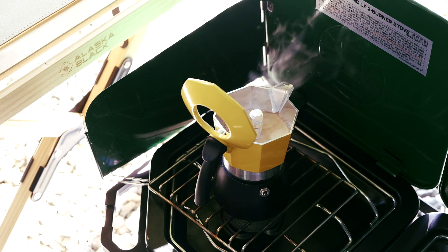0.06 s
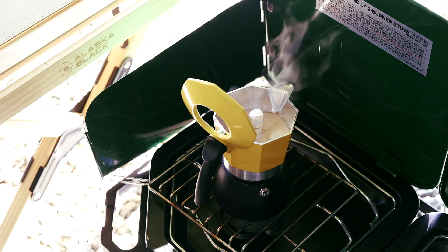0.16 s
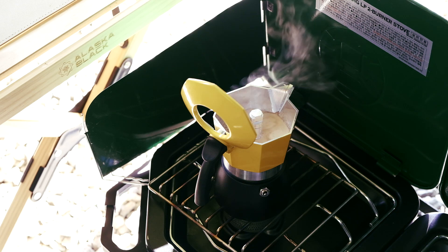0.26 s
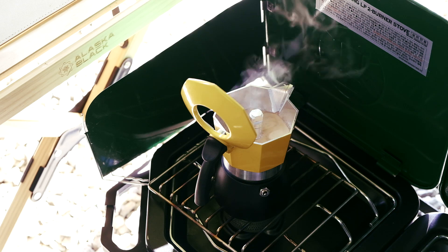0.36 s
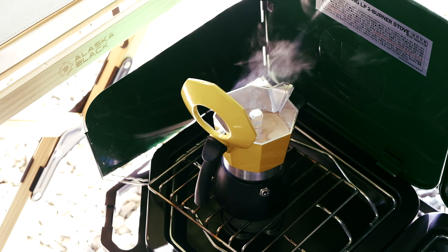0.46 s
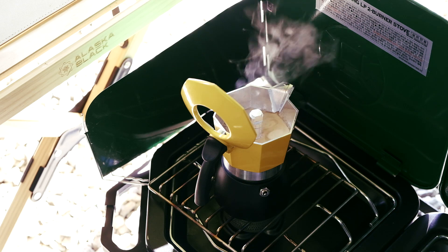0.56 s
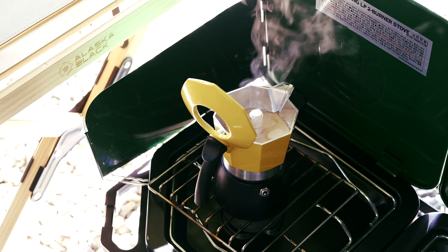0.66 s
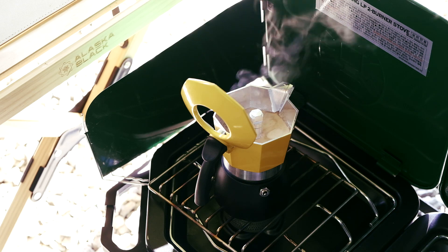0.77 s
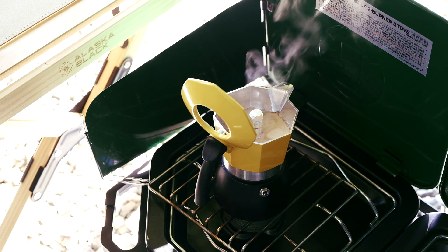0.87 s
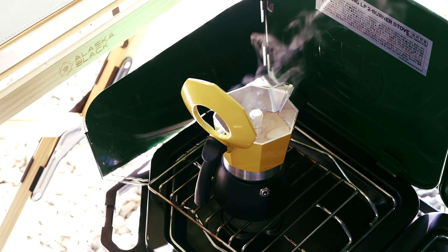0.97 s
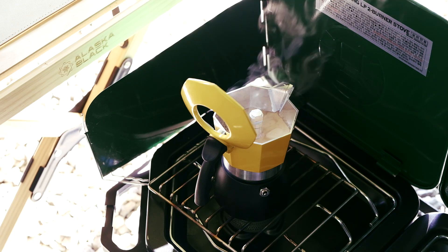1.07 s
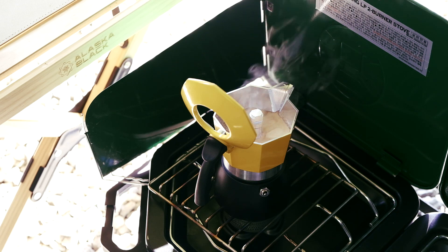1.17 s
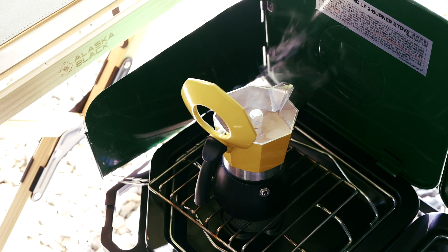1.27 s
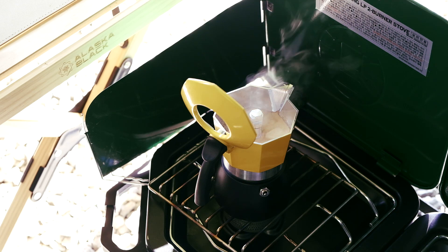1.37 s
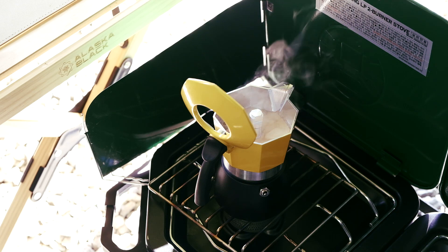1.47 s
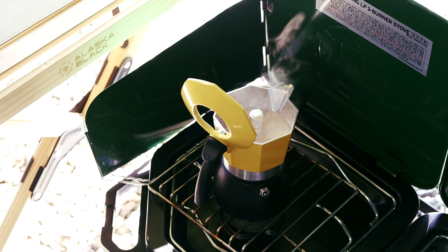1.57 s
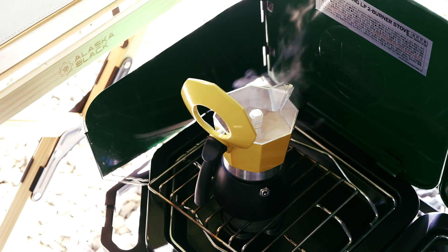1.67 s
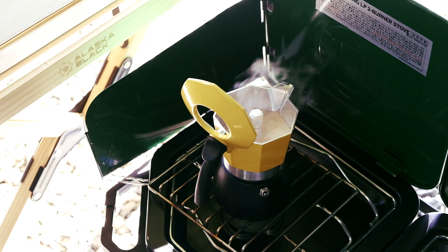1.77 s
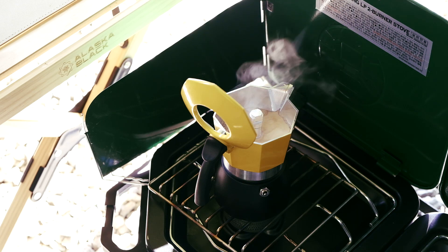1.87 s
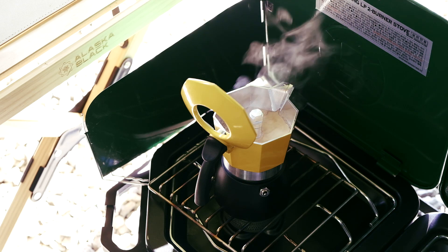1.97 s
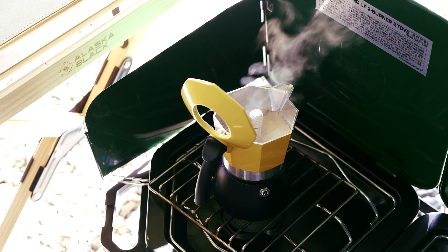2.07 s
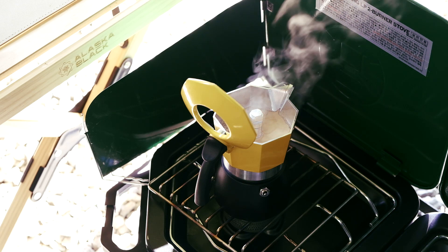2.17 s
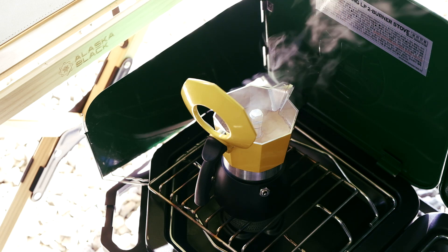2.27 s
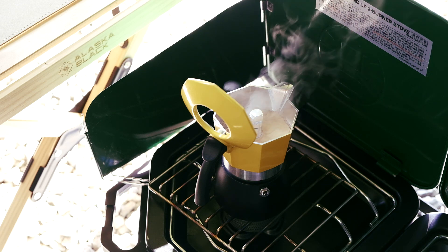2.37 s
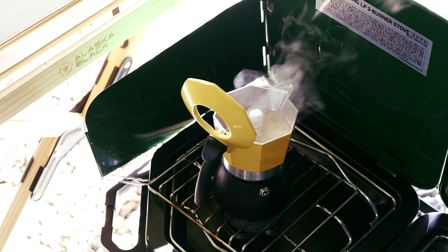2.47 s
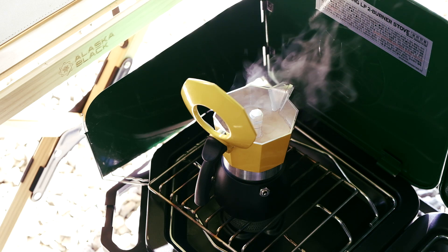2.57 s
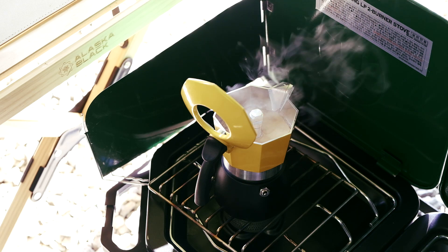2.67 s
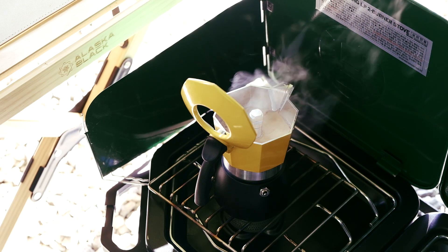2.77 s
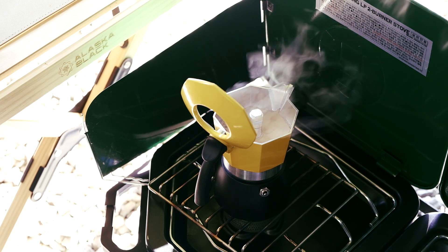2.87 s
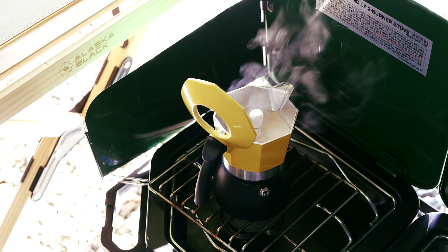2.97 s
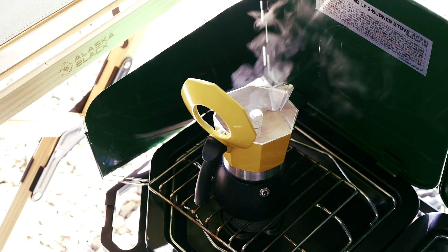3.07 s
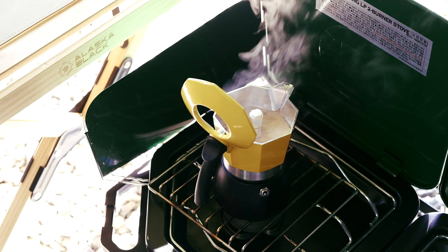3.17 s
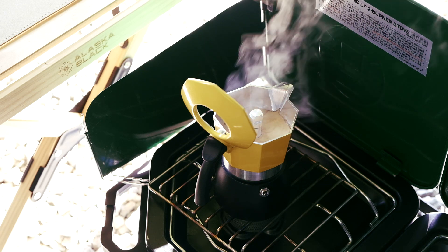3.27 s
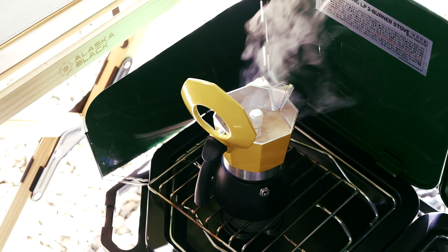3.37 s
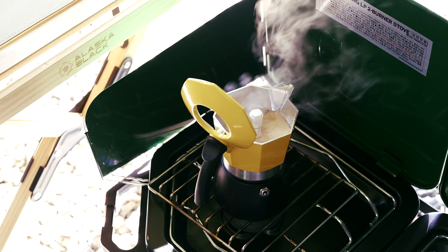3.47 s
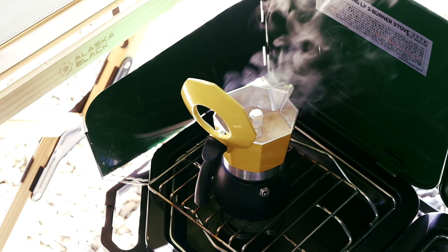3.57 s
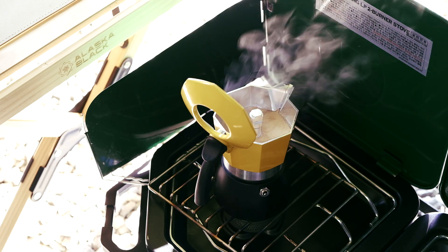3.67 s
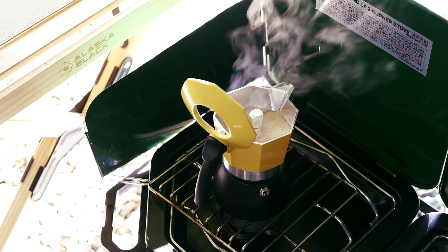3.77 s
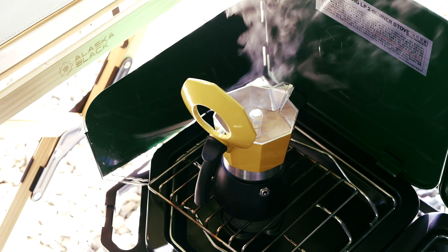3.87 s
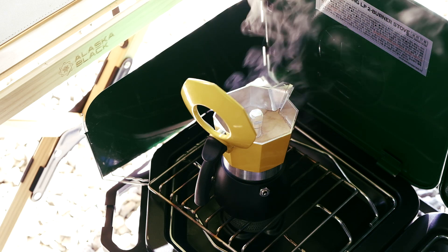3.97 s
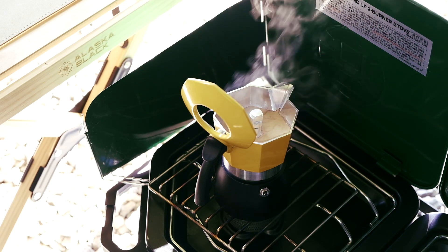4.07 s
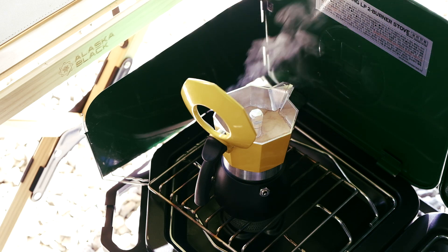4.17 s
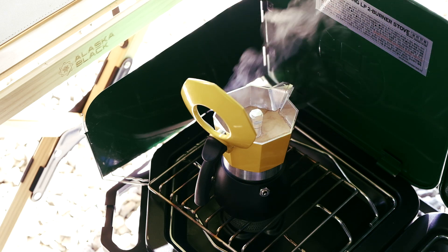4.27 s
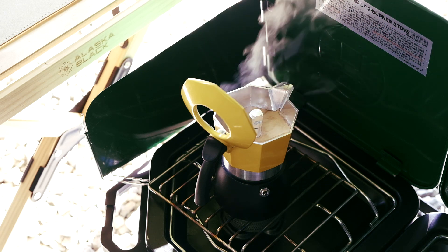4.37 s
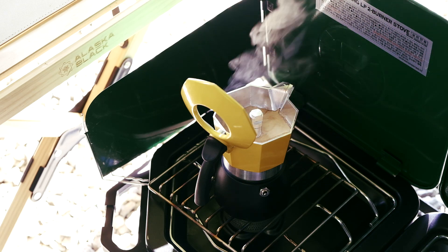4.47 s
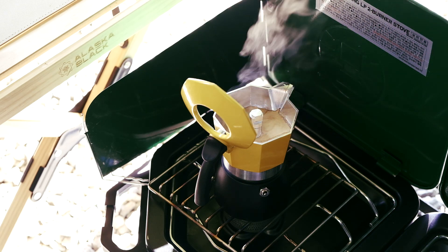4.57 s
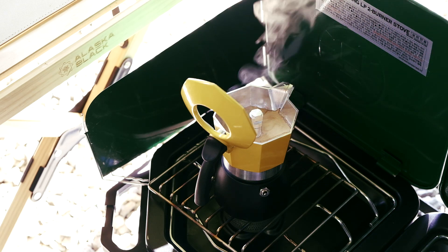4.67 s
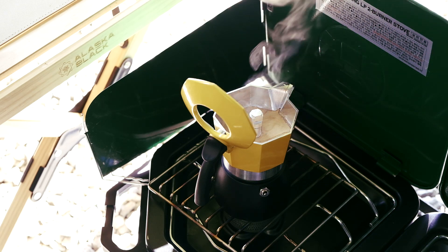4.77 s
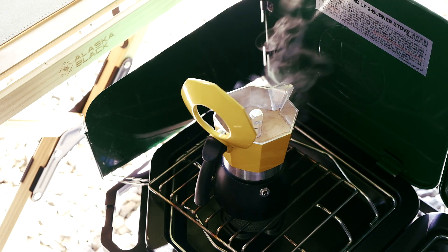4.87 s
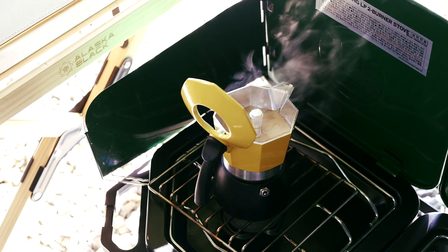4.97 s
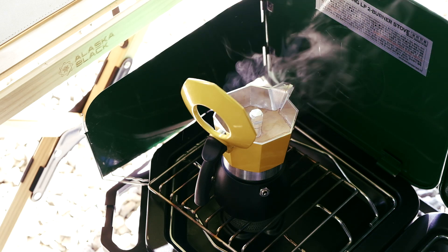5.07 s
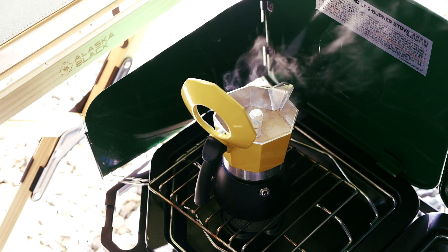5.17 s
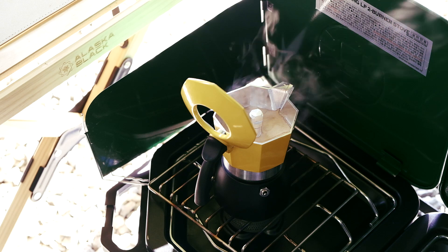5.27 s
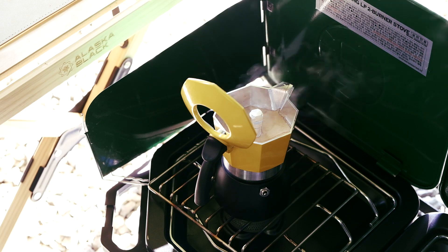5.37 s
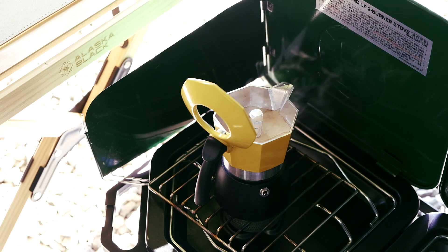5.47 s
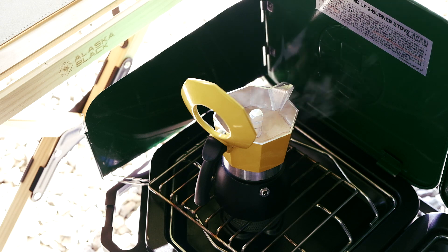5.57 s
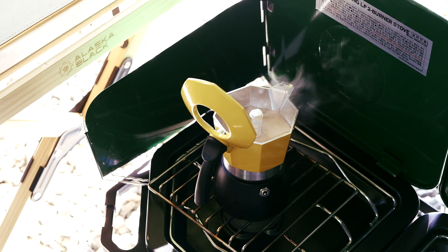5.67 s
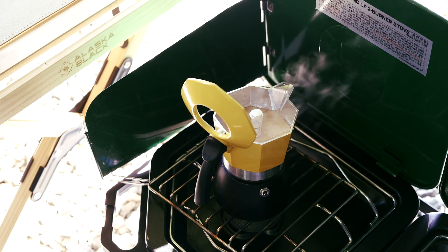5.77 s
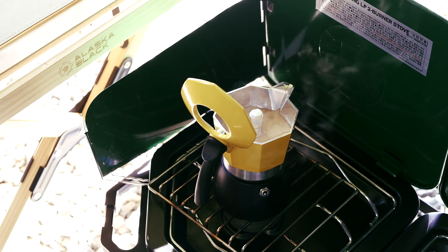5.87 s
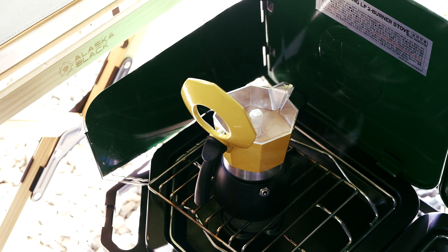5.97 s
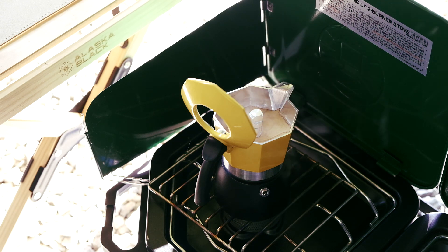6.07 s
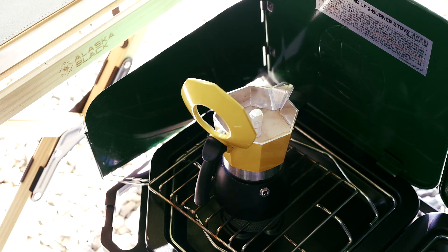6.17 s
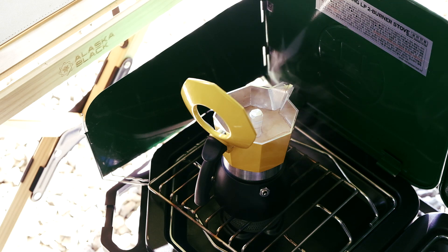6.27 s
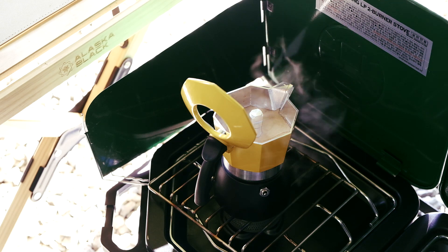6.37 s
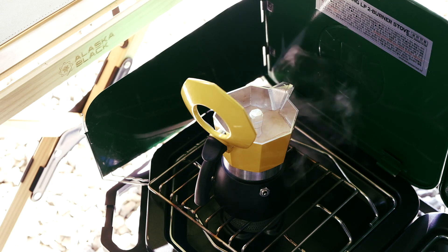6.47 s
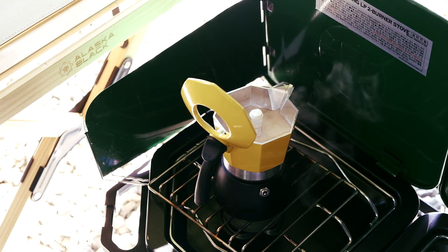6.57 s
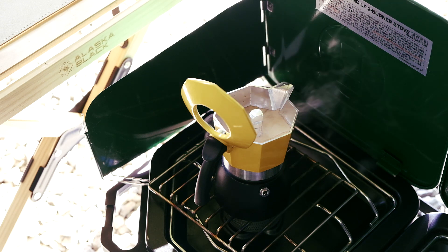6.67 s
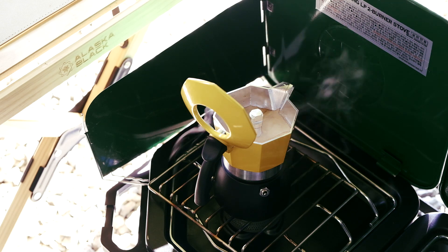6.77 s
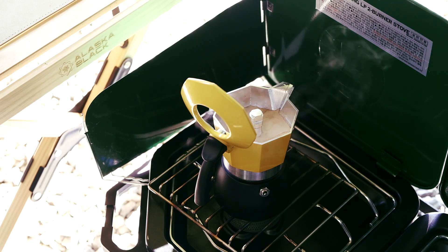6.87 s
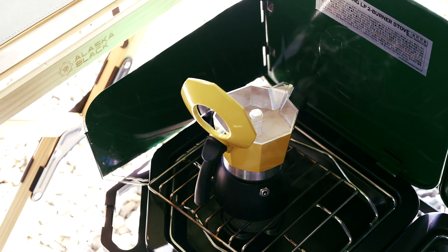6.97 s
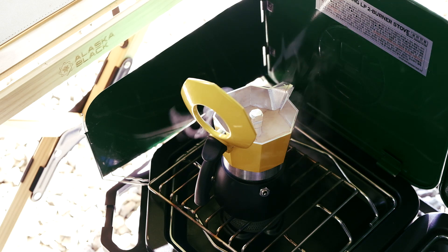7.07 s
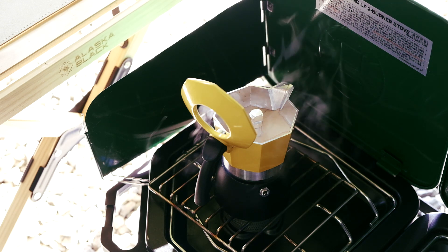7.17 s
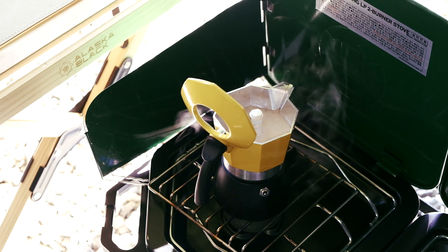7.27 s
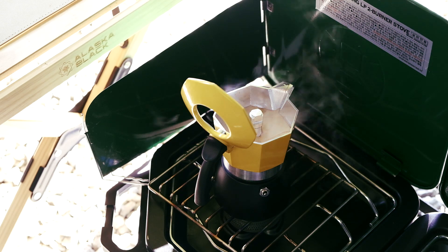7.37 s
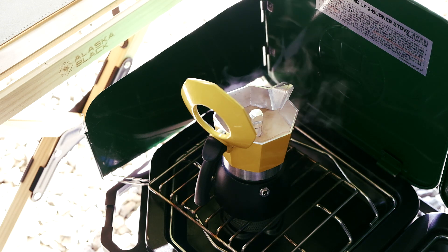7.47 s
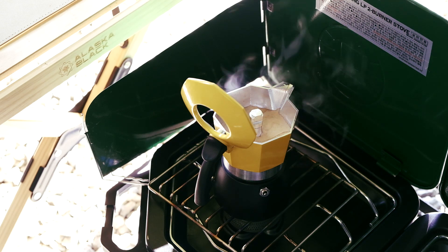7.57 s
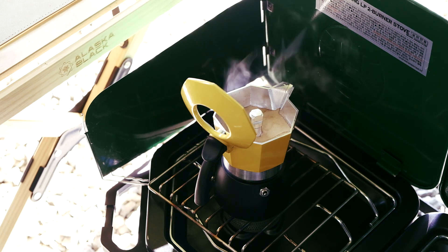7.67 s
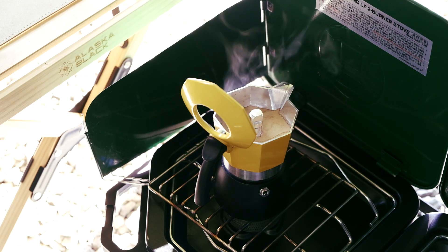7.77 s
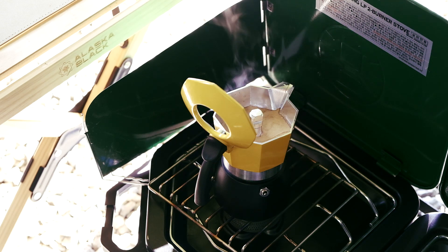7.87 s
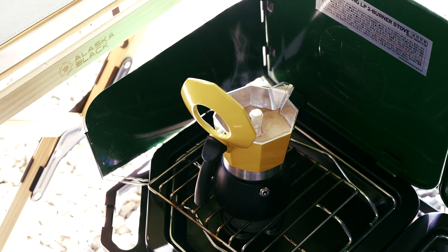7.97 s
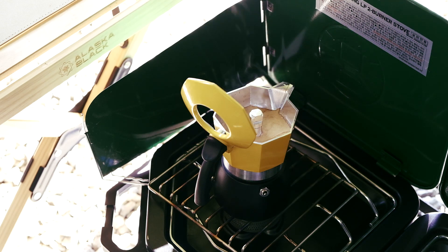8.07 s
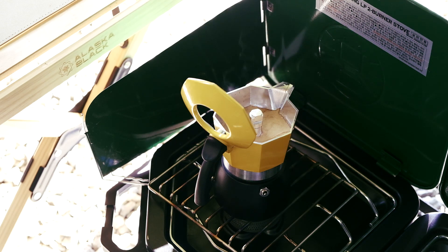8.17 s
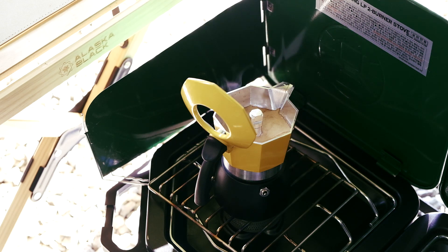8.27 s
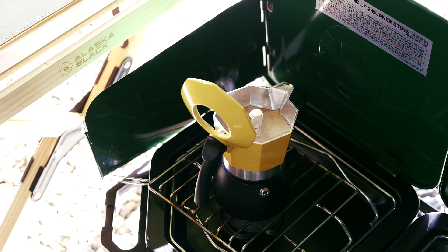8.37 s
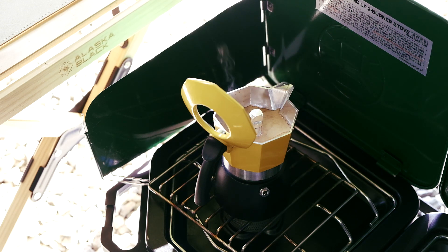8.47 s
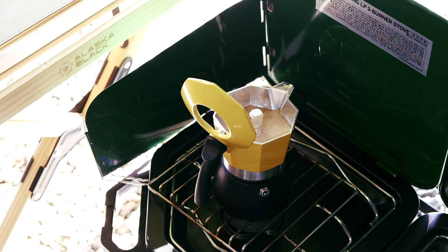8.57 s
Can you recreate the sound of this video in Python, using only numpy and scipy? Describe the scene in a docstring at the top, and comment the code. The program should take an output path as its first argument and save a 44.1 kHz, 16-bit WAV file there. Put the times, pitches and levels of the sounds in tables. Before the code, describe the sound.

A stovetop coffee pot sputters, puffs and squeaks over a fading burner roar; the valve turns shut, leaving faint outdoor air, distant engine and small knocks.

```python
"""A stovetop coffee pot on a gas camping stove, heard close by; a far engine and campsite air run throughout.
From the start noise rings the metal case (roar) and the nozzle (hiss); the roar shrinks as the gas is eased back.
From 2.2 s the hiss sputters ever more, then steam spurts and pitch-climbing wet puffs join; thin squeaks from 4.2 s.
At 5.4 s the knob gives a soft knock: damped modes under a noise scrape. From 7.16 s turns step the valve down to shut.
Further soft knocks follow from 7.76 s; at 8.2 s the valve leaks again and its slit whistles."""
import sys
import numpy as np
from scipy import signal
from scipy.fft import rfft, irfft, next_fast_len
from scipy.io import wavfile
from scipy.ndimage import uniform_filter1d

SR = 44100
rng = np.random.default_rng(int(sys.argv[2]) if len(sys.argv) > 2 else 0)


def master_out(mix):
    """Clip the mix to full scale and print it as 16-bit PCM to the path in sys.argv[1]."""
    frames = np.transpose(np.atleast_2d(mix))
    ceiling = np.clip(frames, -1, 1)
    pcm = np.round(ceiling * 32767).astype(np.int16)
    wavfile.write(sys.argv[1], SR, pcm)


N = 379701
TAPS = 4096
HZ = np.maximum(np.fft.rfftfreq(TAPS, 1 / SR), 1)
TIME = np.arange(N) / SR

# roar shrinking as the gas is eased back: t/s, level/dB
FLAME_ROAR = [(0, -23), (.6, -24), (1.5, -25), (2.7, -26), (3.5, -28), (4.4, -29.5), (5.4, -31),
              (6.3, -33.5), (7.16, -35.5)]
# resonances of the case: f/Hz, width/Hz, level/dB, left minus right/dB
CASE_MODES = [(404, 133, -9.5, 2), (531, 49, -13, -3), (940, 350, -11, -0.5), (1043, 108, -9.5, -1),
              (1370, 80, -4, 0), (1542, 184, -1.5, -0.5), (1790, 90, -5.5, 6), (1951, 105, -3, -5.5),
              (2113, 147, -1.5, -2.5), (2322, 280, -7, -4), (2468, 45, -3.5, -1), (2630, 280, -8, -5),
              (2820, 130, -11, -10), (2944, 190, -11, 2), (3133, 104, -6.5, 1.5), (3310, 133, -7, -3.5),
              (3577, 300, -10.5, -2), (3730, 160, -9.5, -0.5), (3910, 45, -11, 4), (4046, 89, -14, 0),
              (4196, 160, -17.5, -2), (4370, 97, -21, 0)]
# resonances of the burner head: f/Hz, width/Hz, level/dB, left minus right/dB
BURNER_MODES = [(266, 230, -25.5, -1), (1635, 94, -3.5, 2)]
# bands of the case: from f/Hz, to f/Hz, level against full roar/dB, share of shrinking followed,
# share of top-hiss swell followed, waver/dB, flicker/dB, grain/dB, drop while a spurt is wide open/dB
CASE_BANDS = [(0, 700, -19.5, 1.02, .01, 1.5, 0.5, -0.5, -1),
              (700, 2200, 0.21, 1.046, .01, 0.18, 0.75, 0.77, 2),
              (2200, 3400, -5.5, 0.51, 0.24, -0.62, 0.9, 1.45, 6.5),
              (3400, 5000, -16.5, 0.066, 0.16, -0.5, 1.6, 0.9, 5.5)]
# brief flare-ups and gutterings of the starved flame: t/s, change/dB
FLAME_FLARES = [(4.525, 2), (6.87, 3), (7.125, 1.5), (7.235, 4), (7.254, 4), (7.295, 7), (7.325, -7.5),
                (7.341, 8), (7.355, -10), (7.375, 3.5), (7.398, 5.5)]
FLARE_S = 0.0036


def flame(eddy, pops):
    """Roar: deep modes shrink with the flame, steam feeds the highest, except while it spurts."""
    full_db, first_top_db = FLAME_ROAR[0][1], JET_LEVELS[0][2]
    low_db, top_db = curves(JET_LEVELS)[:2]
    shrink_db = curves(FLAME_ROAR)[0] - full_db
    steam_db = top_db - first_top_db
    shut_db = valve()[0]
    flare_db = sum(rise_db * np.exp(-((TIME - s) / FLARE_S) ** 2) for s, rise_db in FLAME_FLARES)
    surge = spurts()[0][0]
    open_share = surge / (surge + undb(low_db))
    roar = 0
    for lo, hi, db, share, fed, waver_db, flicker_db, grain_db, starve_db in CASE_BANDS:
        level_db = full_db + db + share * shrink_db + fed * steam_db
        level_db = level_db + flare_db + shut_db - starve_db * open_share
        flow = undb(level_db) * flutter(eddy, waver_db, flicker_db, grain_db)
        roar = roar + turbulence(flow, band(CASE_MODES + BURNER_MODES, lo, hi), pops)
    return roar


def popping(rate_per_s=400, size_db=12):
    """Tiny pockets of gas ignite at random; every resonance of flame and jets hears the same pop."""
    ignites = rng.random(N) < rate_per_s / SR
    return ignites * undb(size_db) * np.tanh(rng.standard_normal(N))


# jets with the valve open: t/s, low hiss level/dB, top hiss level/dB, sheen above it level/dB,
# highest air level/dB
JET_LEVELS = [(0, -36.5, -42.5, -45.5, -51.5), (.6, -36.5, -40.5, -43, -48), (1.5, -34.5, -38, -40.5, -47),
              (2.5, -33.5, -39, -38, -47), (3.5, -33, -37.5, -38, -46), (4.3, -32, -39, -36.5, -44),
              (4.7, -35, -40, -40.5, -43.5), (5.1, -36, -42.5, -40.5, -45), (5.7, -36, -43, -40.5, -44),
              (6.05, -35.5, -43.5, -40.5, -45.5), (6.5, -36.5, -45, -43, -46),
              (7.16, -36.5, -42.5, -46.5, -45)]
# resonances of nozzle, spout and microphone port: f/Hz, width/Hz, level/dB, left minus right/dB
NOZZLE_MODES = [(4860, 510, -0.5, 0.5), (5625, 740, 0, 1), (6276, 180, 1, 1), (6450, 130, -2.5, 2),
                (6680, 200, 0.5, 2), (6860, 110, 2, -4), (7045, 155, 3.5, 1), (7110, 720, -3.5, -1.5),
                (7225, 100, -1, -2), (7400, 120, -6, -2), (7610, 110, -8, -1), (7830, 130, -7, -1),
                (7820, 920, -14.5, -2), (8120, 161, -12.5, -2), (8600, 570, -13.5, 1), (8970, 176, -13, 0),
                (9470, 310, -21, 1), (9260, 130, -13.5, 3), (9500, 106, -19, 0), (10050, 530, -11.5, 9),
                (10970, 1060, -3.5, -1), (11400, 160, -4.5, 0), (10400, 160, -10, -4), (11670, 270, -6, 4),
                (12260, 260, -6, 5), (12580, 870, -2, 0), (13000, 200, -9, -6), (13400, 500, -5, 1),
                (13850, 700, -6, 0.5), (14250, 400, -10, 3), (14900, 900, -13.5, 1), (15600, 500, -17, -1)]
SPUTTER_FROM_S, SPUTTER_DB_PER_S = 2.2, 0.4
TOP_SPUTTER = 0.55  # share of the sputter reaching the treble
MIDDLE_DB, MIDDLE_DB_PER_S = -41, -0.5
SPURT_SLIT_DB = 2.5  # spurt whistle in the valve slit, against the low spurt


def jets(eddy, pops):
    """Gas and steam hiss: sputters more as the pot runs dry, and spurts break through."""
    low_db, top_db, sheen_db, air_db = curves(JET_LEVELS)
    (low_surge, top_surge), choke_db = spurts()
    flow = flutter(eddy, 0.24, 0.56, 1.0) * undb(valve()[1])
    before_turns = TIME < VALVE_TURNS[0][0]
    dryness_db = SPUTTER_DB_PER_S * np.maximum(TIME - SPUTTER_FROM_S, 0) * before_turns
    sputter = undb(dryness_db * walk(90) + choke_db)
    low = turbulence(flow * (undb(low_db) * sputter + low_surge), band(NOZZLE_MODES, 0, 7500), pops)
    slit = turbulence(flow * low_surge * undb(SPURT_SLIT_DB), SLIT_MODES, pops)
    middle_flow = flow * undb(MIDDLE_DB + MIDDLE_DB_PER_S * TIME)
    middle = turbulence(middle_flow, band(NOZZLE_MODES, 7500, 9700), pops)
    top_sputter_db = (0.54 + TOP_SPUTTER * dryness_db) * walk(60)
    bright = flow * (undb(top_db + top_sputter_db) + top_surge)
    top = turbulence(bright, band(NOZZLE_MODES, 9700, 11900), pops)
    sheen = turbulence(bright * undb(sheen_db - top_db), band(NOZZLE_MODES, 11900, 13200), pops)
    air = turbulence(bright * undb(air_db - top_db), band(NOZZLE_MODES, 13200, 20000), pops)
    return low + slit + middle + top + sheen + air


# sudden spurts of steam: t/s, low hiss peak level/dB, top hiss peak level/dB, length/s
STEAM_SPURTS = [(2.568, -25, -38, 0.028), (2.866, -45, -33, .02), (3.122, -38, -36, .025),
                (3.278, -24, -36, 0.023), (3.3923, -36, -33, .02), (3.517, -32, -32, 0.028),
                (3.57, -28, -40, 0.018), (3.68, -36, -31, .03), (3.837, -33, -26, .02),
                (3.88, -29, -30, 0.022), (3.964, -23, -32, .02), (4.05, -31, -33, 0.022),
                (4.238, -30, -31, .025), (4.26, -26, -40, .02), (4.343, -28, -40, .01),
                (4.395, -40, -31, 0.018), (4.4173, -31, -40, .01), (4.59, -28, -40, .04),
                (4.43, -27, -40, 0.011), (4.4604, -47, -23, 0.03), (4.684, -32.5, -33, 0.025),
                (4.75, -33, -38, 0.023), (4.8, -21, -41, 0.017), (4.869, -25, -40, .012),
                (4.906, -26, -40, .012), (4.982, -26, -38, 0.025), (5.0818, -31, -43, .01),
                (5.114, -21, -34, 0.012), (5.144, -23, -30, 0.025), (5.175, -21, -30, 0.029),
                (5.223, -26, -34, 0.023), (5.288, -40, -30, .01), (5.305, -29, -32, 0.012),
                (5.355, -35, -31, 0.023), (5.42, -22, -28, 0.025), (5.449, -30, -24, .01),
                (5.526, -35, -29, .03), (5.475, -20, -36, 0.025), (5.58, -23, -32, 0.01),
                (5.626, -29, -26, 0.025), (5.6884, -31, -39, 0.025), (5.714, -31, -28, .03),
                (5.755, -23, -25, 0.05), (5.805, -40, -27, .01), (5.835, -23, -42, .012),
                (5.884, -20.5, -32, 0.033), (5.956, -22, -33, 0.023), (6.0584, -37, -46, 0.02),
                (6.0875, -34, -42, .01), (6.136, -25, -36, .03), (6.173, -20, -25, 0.051),
                (6.234, -16, -24, 0.065), (6.294, -26, -29, 0.045), (6.346, -21, -35, 0.013),
                (6.424, -28, -42, .012), (6.455, -20, -28, 0.021), (6.498, -24, -38, 0.017),
                (6.5286, -26, -39, 0.021), (6.5709, -28, -44, .01), (6.6049, -30.5, -46, 0.025),
                (6.635, -26, -44, 0.025), (6.663, -17, -37, 0.025), (6.718, -21.5, -38, 0.025),
                (6.748, -16, -30, 0.025), (6.802, -21, -45, 0.031), (6.85, -23, -44, .01),
                (6.936, -22, -33, 0.025), (6.955, -21, -39, 0.022), (6.992, -17.5, -33, 0.021),
                (7.028, -23, -41, 0.021), (7.068, -15, -37, 0.01), (7.085, -18, -38, 0.018),
                (7.115, -31, -42, .015), (7.146, -30, -46, .015)]
SPURT_RISE_S, SPURT_SAG_T60_S, SPURT_STOP_T60_S = 0.0014, 0.26, 0.049
SPURT_CREST_DB = 17.5  # taken off the peak level
CHOKE_DB, CHOKE_LEAD_S, CHOKE_S = 2, 0.0061, 0.0038  # flow chokes just before each spurt


def spurts():
    """Gains of low and top hiss, and the choke in dB: each spurt opens fast, sags and stops short."""
    surge, choke_db = np.zeros((2, N)), np.zeros(N)
    for s, low_peak_db, top_peak_db, length_s in STEAM_SPURTS:
        near = slice(int((s - .05) * SR), int((s + .2) * SR))
        age = np.maximum(TIME[near] - s, 0)
        rise = 1 - np.exp(-age / SPURT_RISE_S)
        sag = undb(-SPURT_CREST_DB - 60 * age / SPURT_SAG_T60_S)
        stop = undb(-60 * np.maximum(age - length_s, 0) / SPURT_STOP_T60_S)
        surge[:, near] += undb([[low_peak_db], [top_peak_db]]) * rise * sag * stop
        choke_db[near] -= CHOKE_DB * np.exp(-((TIME[near] - s + CHOKE_LEAD_S) / CHOKE_S) ** 2)
    return surge, choke_db


# resonances of the valve slit: f/Hz, width/Hz, level/dB, left minus right/dB
SLIT_MODES = [(4900, 490, -12, -3), (5100, 200, -9, 0), (5440, 120, 0, -2), (5590, 220, 6, 4),
              (5820, 100, 6, 0), (6110, 90, 3, 0), (6290, 210, 0, -0.5), (6620, 250, -6, 0),
              (6880, 400, -4, -3), (13600, 1200, -12, 0), (15000, 1500, -18, 0)]


def leak(eddy):
    """Gas whistles through the slit of the nearly shut valve."""
    return turbulence(undb(valve()[2]) * flutter(eddy, .4, 1.4, 0.87), SLIT_MODES)


# valve turns: t/s, travel/s, flame level against open/dB, jets level against open/dB, slit whistle level/dB
VALVE_TURNS = [(7.163, 0.014, -10.5, -12.5, -75), (7.203, 0.01, -14, -7.5, -43.5),
               (7.376, 0.011, -26, -17, -56), (7.39, .06, -36, -29.5, -59), (7.465, .05, -43, -58, -95),
               (8.197, .005, -27.5, -18, -49)]


def valve():
    """Flame, jet and slit levels in dB; each turn slides from the last setting to the next."""
    rows, last = [], (0, 0, VALVE_TURNS[0][-1])
    for s, travel_s, *setting in VALVE_TURNS:
        rows += [(s, *last), (s + travel_s, *setting)]
        last = setting
    return curves(rows)


# thin squeaks of steam at the spout: t/s, peak level/dB, f/Hz
THIN_SQUEAKS = [(4.1727, -31, 8750), (4.4605, -39, 7900), (4.5356, -32, 8800), (4.5683, -30.5, 8250),
                (4.7334, -36, 8050), (4.8676, -33, 8590), (4.9539, -34, 8300), (5.0267, -34.5, 8380),
                (5.0791, -32, 8300), (5.3425, -30, 8360), (5.6917, -35, 8300), (5.8269, -30, 8670),
                (5.8683, -33, 8080), (6.0554, -28.5, 8300), (6.0912, -33, 8330), (6.2385, -40, 8700),
                (6.438, -26, 8550), (6.6118, -31, 8910), (6.636, -32, 8800), (6.7134, -29, 8480),
                (6.7882, -37.5, 8300), (6.882, -26, 8800), (7.1389, -32, 8800)]
# wet puffs at the spout: t/s, peak level/dB, f/Hz
WET_PUFFS = [(2.7074, -32, 3200), (2.8494, -23, 3140), (2.995, -20, 3010), (3.014, -23, 3350),
             (3.3343, -22, 3300), (3.39, -27, 3160), (3.452, -21, 3270), (3.5973, -26, 3260),
             (3.615, -19, 3150), (3.6715, -24, 3200), (4.085, -23, 3360), (4.095, -23, 3670),
             (4.145, -37, 3150), (4.3919, -31, 3280), (4.5501, -23, 3180), (4.5697, -19, 4150),
             (4.7096, -33, 3720), (4.8512, -23, 3320), (4.9353, -30, 3350), (5.018, -29, 3310),
             (5.093, -20.5, 3590), (5.136, -31, 3290), (5.0762, -26, 3140), (5.2, -34, 3400),
             (5.32, -24, 3600), (5.38, -26, 3260), (5.6, -30, 3740), (5.654, -27, 3720),
             (5.8057, -23, 3320), (6.016, -24, 3540), (6.0592, -24, 3880), (6.321, -30, 3320),
             (6.3764, -24, 3900), (6.489, -33, 3360), (6.5894, -26, 3740), (6.775, -28, 3320),
             (6.8477, -24, 3720), (6.8996, -21.5, 3490), (7.127, -24, 3670), (7.174, -33, 3700),
             (7.196, -32.5, 3200)]
PUFF_RING, PUFF_RING_DB = 0.58, -7  # exponent on the upper case resonances; level of the puffs through them


def squeaks():
    """Steam forces its way through coffee at the spout; wet puffs partly ring the case."""
    thin = puffs(THIN_SQUEAKS, crest_db=7.5, width_hz=1000, length_s=0.0057, glide=0.0085)
    wet = puffs(WET_PUFFS, crest_db=8.0, width_hz=1240, length_s=.011, glide=0.039)
    ring = resonances(band(CASE_MODES, 2900, 4500)) ** PUFF_RING
    return thin + colour(wet, ring * windshield() * undb(PUFF_RING_DB))


def puffs(rows, crest_db, width_hz, length_s, glide):
    """Short swells of narrow noise whose pitch climbs as the opening narrows."""
    out, age = np.zeros(N + SR), np.arange(SR // 5) / SR
    sos = signal.butter(2, width_hz / 2, fs=SR, output="sos")
    swell = age / length_s * np.exp(1 - age / length_s)
    for s, db, hz in rows:
        noise = rng.standard_normal((2, len(age)))
        a, b = signal.sosfilt(sos, noise) / np.sqrt(width_hz / SR)
        turn = 2 * np.pi * hz * np.cumsum(1 + glide * (age / length_s - 1)) / SR
        tone = a * np.cos(turn) + b * np.sin(turn)
        start = int(s * SR)
        out[start:start + len(age)] += undb(db - crest_db) * swell * tone
    return out[:N]


# soft knocks: t/s, level/dB, scrape t60/s, tone f/Hz, fall away from the tone/dB per octave,
# factor on the mode ring times (short where the hand damps it)
STOVE_KNOCKS = [(5.39, -40, 0.17, 235, 24, 1), (7.759, -44, .03, 970, 7, 0.55),
                (7.768, -47, .03, 1100, 3, .5), (7.782, -49, .04, 1300, 4, .5),
                (7.915, -49, .08, 970, 20, 1.3), (7.93, -50, .08, 900, 6, 1),
                (7.955, -51, 0.05, 970, 22, 1), (8.015, -52, .04, 975, 10, .7), (8.1, -52, .04, 345, 24, 1),
                (8.172, -48, .04, 335, 26, 1), (8.174, -51, .1, 970, 10, .6),
                (8.201, -49, .012, 2200, 4, .5), (8.247, -43, .015, 850, 8, .35),
                (8.26, -51, .03, 400, 8, 1), (8.28, -38, 0.015, 1100, 4.4, .35),
                (8.292, -45, .03, 900, 4, .35), (8.33, -52, .03, 800, 6, .4),
                (8.358, -53, .03, 1200, 6, .4), (8.388, -52, .02, 1000, 6, .4),
                (8.445, -43, 0.1, 235, 18, 1), (8.465, -48, .06, 330, 14, 1),
                (8.452, -53, .04, 1100, 4, .4)]
# what the knocks ring with: f/Hz, level/dB, t60/s
KNOB_MODES = [(233, -1, 0.18), (350, 0.5, 0.11), (450, -3, 0.1), (638, -2, .04), (745, -3, 0.044),
              (856, -1, .03), (977, 1, 0.08), (1130, -3, .03), (1290, 1.5, 0.04), (1420, -7, .025),
              (1595, -11, 0.06), (1982, -10, 0.027), (2500, -13, .03)]
KNOCK_RISE = .08  # share of the scrape t60
KNOCK_TAP, KNOCK_PUSH_S = 0.98, .0005  # first touch against the scrape; softness of the contact


def knocks():
    """Rough scrapes that die away; each rings mostly the modes near its own tone."""
    out, age = np.zeros(N + SR), np.arange(SR // 4) / SR
    hz, db, t60 = np.transpose(KNOB_MODES)[:, :, None]
    for s, peak_db, scrape_s, tone_hz, slope_db, free in STOVE_KNOCKS:
        near_db = -slope_db * np.abs(np.log2(hz / tone_hz))
        decay = undb(db + near_db - 60 * age / (free * t60))
        ring = np.sum(decay * np.sin(2 * np.pi * hz * age), axis=0)
        ring = ring * np.tanh(age / KNOCK_PUSH_S)
        rise = 1 - np.exp(-age / (KNOCK_RISE * scrape_s))
        push = rng.standard_normal(len(age)) * undb(-60 * age / scrape_s) * rise
        push[0] = KNOCK_TAP * np.sqrt(np.sum(push ** 2))
        push = push / np.sqrt(np.sum(push ** 2))
        sound = signal.fftconvolve(ring, push)[:len(age)]
        start = int(s * SR)
        out[start:start + len(age)] += undb(peak_db) * sound
    return out[:N]


# far engine: t/s, first order level/dB, second order level/dB, third order level/dB, fourth order level/dB
ENGINE_ORDERS = [(0, -56, -61, -57, -60), (.45, -55, -62.5, -60.5, -69), (1.3, -61, -68, -69, -72),
                 (1.8, -68.5, -66, -65, -63), (2.1, -56, -70, -75, -70), (2.5, -50.5, -71, -74, -72),
                 (3.0, -68, -63.5, -66, -59), (3.6, -57, -75, -67, -64), (4.2, -61, -71, -71, -70),
                 (4.8, -64, -68, -63, -68), (5.15, -63, -69, -68, -68), (5.55, -57, -64, -58, -54),
                 (5.9, -55, -57.5, -61, -68), (6.2, -54, -56.5, -70, -70), (6.45, -54.5, -72, -68, -66),
                 (6.9, -57, -67, -75, -67), (7.2, -58, -63, -66.5, -64), (7.45, -55, -60.5, -62.5, -77),
                 (7.65, -58, -62, -70, -72), (7.9, -52.5, -64, -76, -69), (8.33, -53.5, -63.5, -76, -71),
                 (8.45, -63, -70, -70, -74), (8.61, -52, -69, -66, -70)]
ENGINE_HZ = 86.9


def engine():
    """Nearly steady firings heard as four orders that swell on the wind."""
    turn = 2 * np.pi * ENGINE_HZ * np.cumsum(1 + 0.002 * walk(3.02)) / SR
    hum = 0
    for order, db in enumerate(curves(ENGINE_ORDERS), start=1):
        hum = hum + undb(db + 1.1 * walk(10)) * np.sin(order * turn)
    return np.sqrt(2) * hum


# spectrum of the campsite: f/Hz, level per Hz/dB
CAMP_SPECTRUM = [(20, -13), (40, -7.5), (70, -3), (130, -2.5), (220, -7), (350, -7), (600, -11),
                 (1000, -13.5), (2500, -22.5), (5000, -29), (10000, -38), (16000, -47)]
# campsite air, noise before colouring: t/s, level/dB
CAMP_BREEZE = [(0, -49.5), (1, -59), (2.5, -59), (4, -55.5), (5, -55), (5.4, -49.5), (5.7, -52),
               (6.2, -52.5), (7.4, -59.5), (7.75, -59), (8.05, -57), (8.25, -52.5), (8.61, -55)]
RUMBLE_DB, RUMBLE_HZ = -55.5, 70  # steady below this pitch; noise level before colouring
AIR_HZ, AIR_DB = 1300, -53.5  # steady above this pitch; noise level before colouring


def camp(wide_hz=900):
    """Distant rumble and air; one in the bass; above it a common part, a part opposite left and right, and
    separate air in each ear."""
    gain = shape(CAMP_SPECTRUM)
    gain = gain / np.sqrt(np.mean(gain ** 2))
    deep = 1 / (1 + (HZ / RUMBLE_HZ) ** 8)
    high = 1 / (1 + (AIR_HZ / HZ) ** 4)
    breeze = undb(curves(CAMP_BREEZE)[0] + 1.3 * walk(8))
    mid, side = breeze * rng.standard_normal((2, N))
    air = colour(undb(AIR_DB) * rng.standard_normal((2, N)), gain * np.sqrt(high))
    gain = gain * np.sqrt(1 - high)
    rumble = colour(undb(RUMBLE_DB) * rng.standard_normal(N), gain * np.sqrt(deep))
    middle = colour(mid, gain * np.sqrt(1 - deep))
    wide = colour(side, gain / (1 + (wide_hz / HZ) ** 3)) * np.array([[1], [-1]])
    return rumble + middle + wide + air


# sound opposite in left and right: f/Hz, level against the common part/dB
STEREO_SPREAD = [(300, -57), (700, -16), (1300, -27.5), (1600, -25), (1900, -12.5), (3000, -14.5),
                 (3600, -19), (4300, -5.5), (4800, -13.5), (5500, -8.5), (6400, -12.5), (7000, -14),
                 (7500, -5), (8900, -8), (10200, -0.5), (10700, -10), (12300, -9.5), (14000, -3.5),
                 (15400, 5)]
BLUR_HZ = 696  # echoes off the camp table blur the resonances over this width


def turbulence(gain, modes, pops=0):
    """Eddy noise and pops ring the resonances; scattered echoes, blurred in pitch, differ left and right."""
    common, wide = rng.standard_normal((2, N))
    ring = resonances(modes)
    blurred_power = uniform_filter1d(np.mean(ring ** 2, axis=0), int(BLUR_HZ * TAPS / SR))
    blurred = np.sqrt(np.abs(blurred_power))
    direct = colour(gain * (common + pops), ring * windshield())
    echoes = colour(gain * wide, blurred * shape(STEREO_SPREAD))
    return direct + echoes * np.array([[1], [-1]])


# narrow cancellations between direct sound and the windshield echo: f/Hz, width/Hz, depth/dB
WINDSHIELD_DIPS = [(630, 17, 15), (1698, 27, 10), (1824, 22, 6), (2006, 19, 12), (2203, 24, 3.5),
                   (2450, 25, 7), (2875, 25, 3), (3050, 25, 6), (3210, 25, 9), (3370, 30, 8.5),
                   (3620, 30, 4.5), (5370, 45, 3), (5870, 40, 4), (6050, 69, 6), (6900, 40, 5),
                   (7130, 37, 6), (7310, 40, 8), (7520, 40, 4), (7710, 40, 4), (7900, 50, 4), (8000, 50, 3),
                   (8580, 50, 4), (8800, 50, 0), (9870, 60, 9), (10400, 70, 8), (11200, 97, 8),
                   (11900, 70, 4), (12500, 60, 3), (12640, 50, 2), (13080, 90, 3), (14100, 60, 5),
                   (14460, 70, 7)]


def windshield():
    """Gain with the narrow echo cancellations cut in."""
    hz, width, depth_db = np.transpose(WINDSHIELD_DIPS)[:, :, None]
    return undb(-np.sum(depth_db / (1 + ((HZ - hz) / (width / 2)) ** 2), axis=0))


def flutter(eddy, slow_db, quick_db, grain_db):
    """Unsteady flow: an own waver and flicker, and a fine grain shared by flame and jets."""
    return undb(slow_db * walk(12) + quick_db * walk(60) + grain_db * eddy)


def walk(rate_hz):
    """Random levels held 1 / rate_hz and slewed twice; spread 1."""
    k = int(SR / rate_hz)
    held = np.repeat(rng.standard_normal(N // k + 1), k)
    w = uniform_filter1d(uniform_filter1d(held, k), k)[:N]
    return w / w.std()


def resonances(modes):
    """Left and right gain of steep resonances added in power; mean power over both ears is 1."""
    hz, width, db, pan_db = np.transpose(modes)[:, :, None]
    bell = 1 / (1 + ((HZ ** 2 - hz ** 2) / (HZ * width)) ** 2)
    power = np.array([np.sum((undb(db + ear * pan_db / 2) * bell) ** 2, axis=0) for ear in (1, -1)])
    return np.sqrt(power / power.mean())


def band(modes, lo, hi):
    """The modes between two frequencies in Hz."""
    return [m for m in modes if lo <= m[0] < hi]


def colour(x, gain):
    """Causal (minimum-phase) filter with this gain, from the cepstrum of its log."""
    fold = np.r_[1, np.full(TAPS // 2 - 1, 2), 1, np.zeros(TAPS // 2 - 1)]
    cepstrum = irfft(np.log(gain + 1e-6))
    response = irfft(np.exp(rfft(cepstrum * fold)))
    return signal.oaconvolve(np.atleast_2d(x), np.atleast_2d(response), axes=1)[:, :N]


def shape(points):
    """Gain over HZ of (f/Hz, level/dB) points."""
    hz, db = np.transpose(points)
    return undb(np.interp(np.log(HZ), np.log(hz), db))


def curves(rows):
    """Columns of a t/s table, read at every sample."""
    s, *columns = np.transpose(rows)
    return [np.interp(TIME, s, c) for c in columns]


def undb(db):
    """Gain of a level in dB."""
    return 10 ** (np.asarray(db) / 20)


def scene():
    """Stove close by, engine and air far off."""
    eddy, pops = walk(500), popping()
    stove = flame(eddy, pops) + jets(eddy, pops) + leak(eddy) + squeaks() + knocks()
    return stove + engine() + camp()


MONO_HZ, TOP_HZ, LEFT_LAG_S = 870, 15720, .9e-5


def record(dry):
    """Two close ports: the bass is one, the left hears a touch late; the top is cut."""
    size = next_fast_len(N)
    hz = np.fft.rfftfreq(size, 1 / SR)
    left, right = rfft(dry, size)
    left = left * np.exp(-2j * np.pi * hz * LEFT_LAG_S)
    mid = (left + right) / 2
    side = (left - right) / 2 / (1 + (MONO_HZ / (hz + 1)) ** 8)
    wet = irfft(mid + side * np.array([[1], [-1]]), size)[:, :N]
    return signal.sosfilt(signal.ellip(14, .2, 70, TOP_HZ, fs=SR, output="sos"), wet)


dry = scene()
out = record(dry)
master_out(out)
```